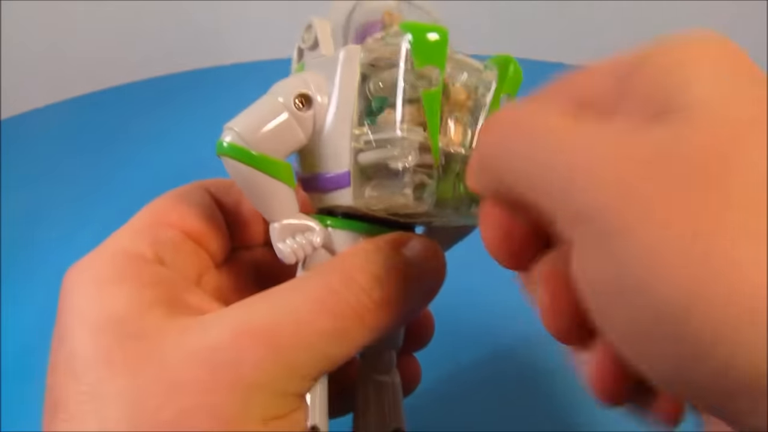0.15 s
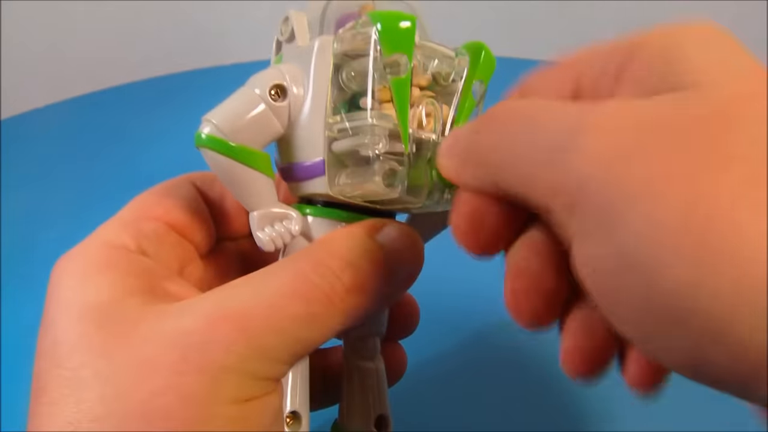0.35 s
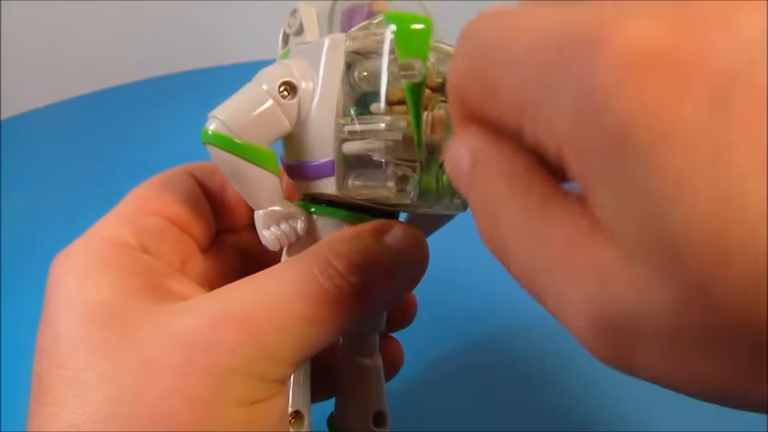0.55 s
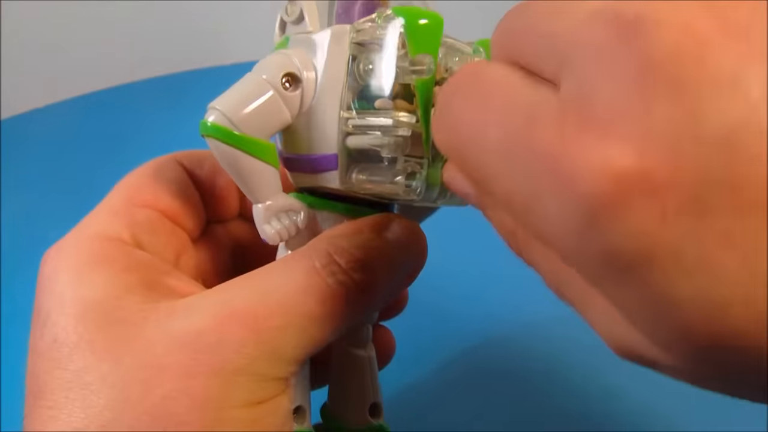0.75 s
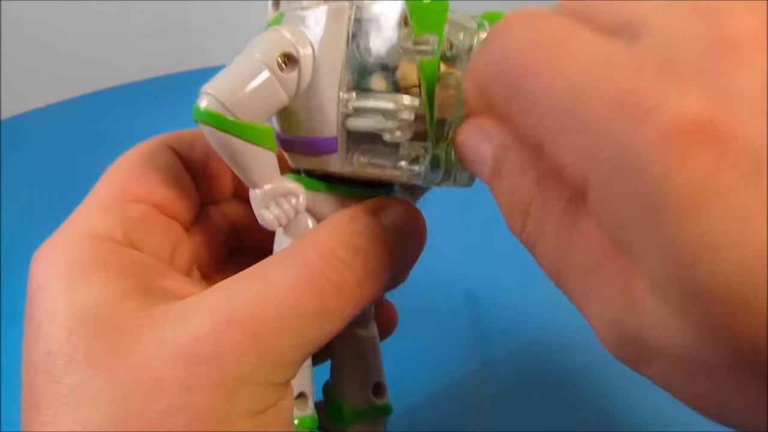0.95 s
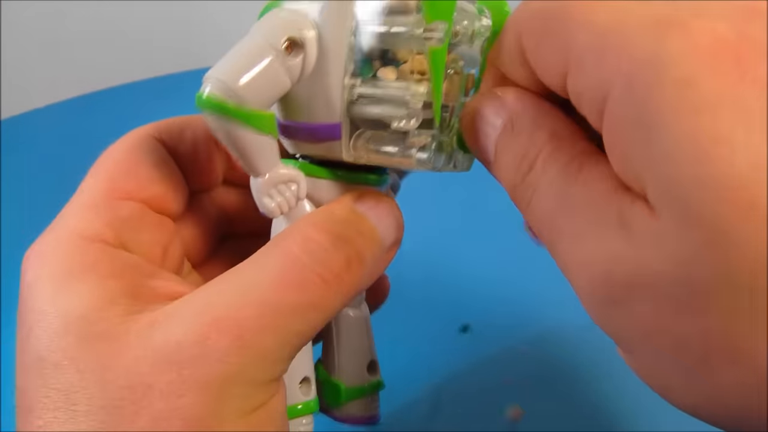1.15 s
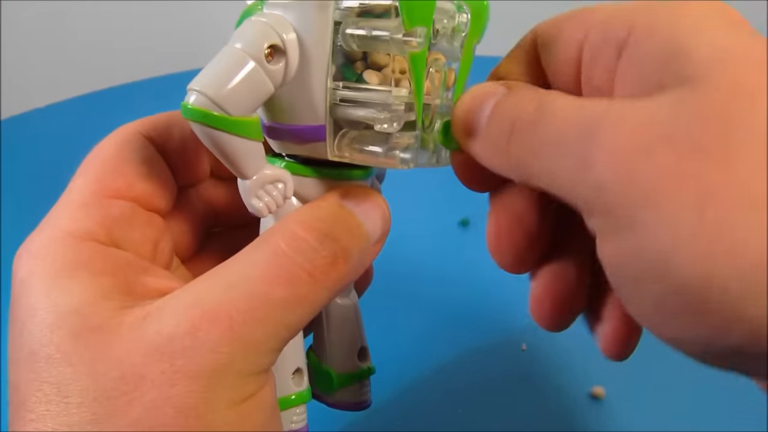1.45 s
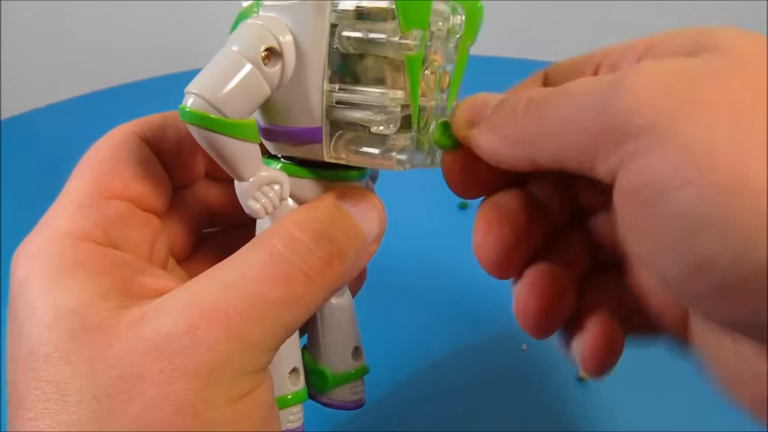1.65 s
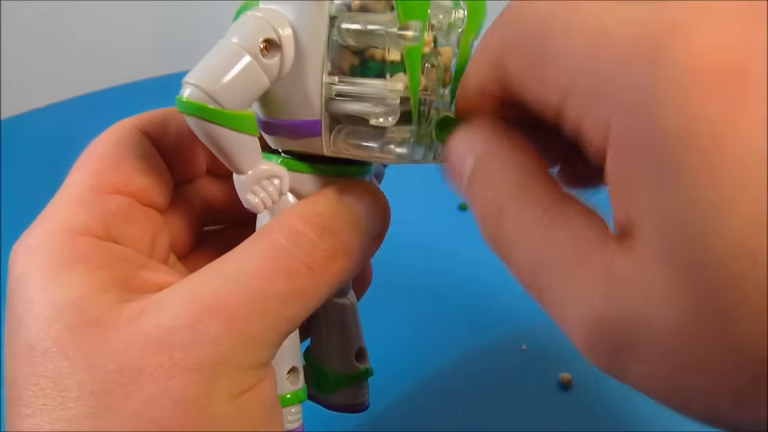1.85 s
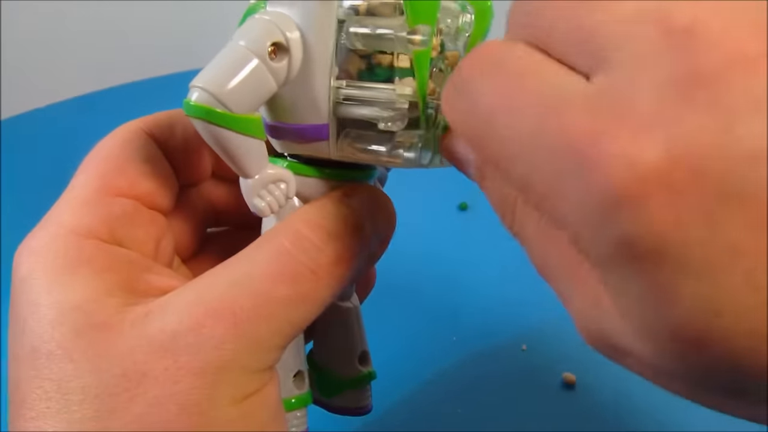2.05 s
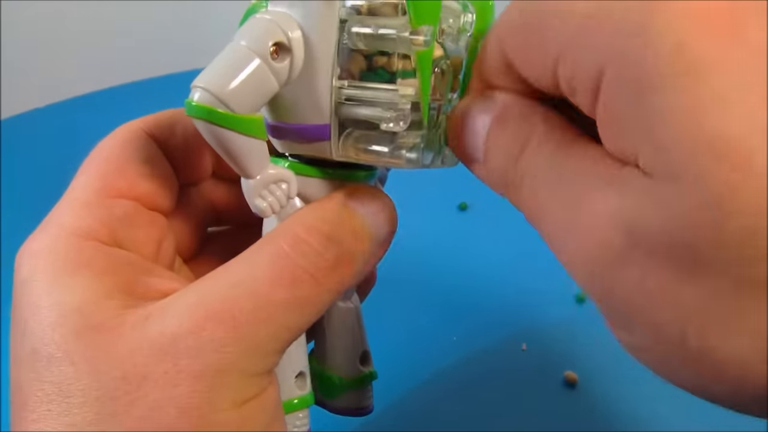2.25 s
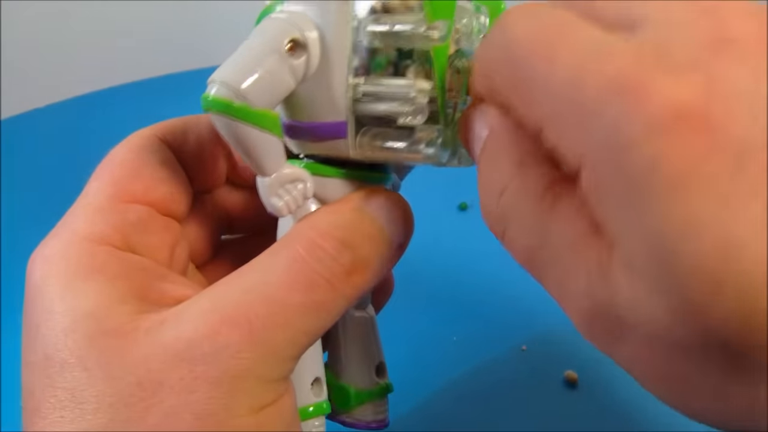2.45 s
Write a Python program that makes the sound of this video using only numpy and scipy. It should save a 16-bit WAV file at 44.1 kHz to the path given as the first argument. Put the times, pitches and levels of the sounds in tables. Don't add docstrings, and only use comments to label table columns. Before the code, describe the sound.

A small plastic wind-up toy whirrs with a harsh, buzzy gear rattle and sharp periodic snaps

```python
import sys
import numpy as np
from scipy import signal
from scipy.fft import rfft, irfft
from scipy.io import wavfile
from scipy.ndimage import uniform_filter1d

SR = 44100
rng = np.random.default_rng(int(sys.argv[2]) if len(sys.argv) > 2 else 0)


def attenuation_scalar(level_db):
    decades = np.asarray(level_db, float) / 20
    return 10 ** decades


def unload_audio(sound):
    columns = np.transpose(np.atleast_2d(sound))
    steps = np.round(np.clip(columns, -1, 1) * 32767)
    wavfile.write(sys.argv[1], SR, steps.astype(np.int16))


N = 114660


def unit(x):
    return x / np.sqrt(np.mean(x ** 2))


def ring(x, hz, width_hz):
    return signal.lfilter(*signal.iirpeak(hz, hz / width_hz, SR), x)


def colour(x, table):
    hz, db = np.array(table).T
    f = np.arange(2049) * SR / 4096 + 1
    log_gain = np.interp(np.log(f), np.log(hz), db) * np.log(10) / 20
    cepstrum = irfft(log_gain)
    cepstrum[1:2048] *= 2
    cepstrum[2049:] = 0
    response = irfft(np.exp(rfft(cepstrum)))[:2048]
    return signal.fftconvolve(x, response)[:len(x)]


def walk(rate_hz):
    k = int(SR / rate_hz)
    chance = rng.standard_normal(N // 50)[:N // k + 1]
    held = np.repeat(chance, k)
    return unit(uniform_filter1d(uniform_filter1d(held, k), k)[:N])


def clicks(at_s, size):
    at = np.clip(at_s * SR, 0, N - 2)
    i = at.astype(int)
    return np.bincount(i, size * (1 - at + i), N) + np.bincount(i + 1, size * (at - i), N)


RELEASES_S = [
    -.58,
    .2,
    .932,
    1.708,
    2.48,
]
TOOTH_DB = [
    0,
    -5,
    -4,
]
TURN_HZ, UNWIND_HZ_PER_S = 214, 8
RACE_HZ, RACE_S = 45, .33
TOOTH_SCATTER_DB, TOOTH_JITTER_S = 2, .0001


def tooth_ticks(t):
    since = t - np.array(RELEASES_S)[np.searchsorted(RELEASES_S, t, side="right") - 1]
    turn_hz = TURN_HZ - UNWIND_HZ_PER_S * t + RACE_HZ * np.exp(-since / RACE_S)
    contacts = len(TOOTH_DB) * np.cumsum(turn_hz * (1 + .006 * walk(12))) / SR
    k = np.arange(int(contacts[-1]))
    late, strong, sign = rng.standard_normal((N // 20, 3)).T[:, k]
    at_s = np.interp(k, contacts, t) + TOOTH_JITTER_S * late
    level_db = np.array(TOOTH_DB)[k % len(TOOTH_DB)] + TOOTH_SCATTER_DB * strong
    return clicks(at_s, attenuation_scalar(level_db) * np.sign(sign))


CHATTER_PER_S, CHATTER_DB = 2500, -6


def loose_chatter():
    wait, sign, weak = rng.random((N // 8, 3)).T
    at_s = np.cumsum(-np.log(wait)) / CHATTER_PER_S
    chatter = clicks(at_s, np.sign(sign - .5) * attenuation_scalar(-12 * weak))
    chatter[-2:] = 0
    return attenuation_scalar(CHATTER_DB) * chatter


# t/s, level/dB, grip of the hand on the shell/0-1
GEARS = [(0, -18.5, 0.4), (.045, -27.5, 0.86), (.07, -29, 0.32), (.17, -27.5, 0.08), (.25, -25, 0.12),
         (.42, -23, 0.15), (.62, -23.5, 0), (.92, -26, 0.16), (.955, -30.5, 0.3), (1.1, -25, 0.23),
         (1.28, -22.5, 0.28), (1.69, -25, 0.38), (1.76, -25.5, .7), (1.97, -23, 0.7), (2.099, -22, 1),
         (2.47, -23, 0.73), (2.52, -27.5, 0.95), (2.6, -23.5, .75)]
# f/Hz, width/Hz, peak level/dB, grip where it rings best/0-1, loss per unit of grip away/dB
SHELL = [(833, 28, -12.5, 0.7, 12.5), (1500, 29, -16, 0.6, 6), (1752, 24, -11.5, 0.44, 3.5),
         (2933, 117, 3, 0.02, 9), (3164, 104, 7, 0, 33.5), (3343, 120, 5, 0.71, 17),
         (4500, 190, -18, 0.66, 22), (5020, 39, -1.5, .95, -1), (5169, 94, 6.5, 0.84, 4.5),
         (5660, 132, 4.5, 0.12, 29), (6320, 204, -2.5, 0.27, 12), (6870, 133, -3.5, 0.64, 21.5),
         (8070, 330, -8.5, 0, 13), (9200, 330, -6.5, .4, -2)]
# f/Hz, level/dB
TICK = [(200, -39), (400, -40.5), (800, -15), (2200, -11), (3200, 1.5), (6500, -1), (11000, -12),
        (15500, -18.5)]
TICK_DB, SLIDE_DB = -4.5, -23.5
TICK_SMEAR_S = .004


def gears(t):
    s, db, grip = np.array(GEARS).T
    force = tooth_ticks(t) + loose_chatter() + attenuation_scalar(SLIDE_DB) * rng.standard_normal(N)
    g = np.clip(np.interp(t, s, grip), 0, 1)
    shell = np.zeros(N)
    for hz, width_hz, top_db, best, loss_db in SHELL:
        mode_db = top_db - loss_db * np.abs(g - best) + 1.34 * walk(8.98)
        shell += attenuation_scalar(mode_db) * ring(force, hz, width_hz)
    paths = rfft(rng.standard_normal(2048) * attenuation_scalar(-60 * t[:2048] / TICK_SMEAR_S))
    spread = irfft(paths / np.abs(paths))[:1024]
    force = signal.fftconvolve(force, spread)[:N]
    train = unit(shell + attenuation_scalar(TICK_DB) * colour(force, TICK))
    return train * attenuation_scalar(np.interp(t, s, db) + 0.95 * walk(24.615))


# t/s, peak level/dB, brightness f/Hz, t60/s, hollow body level/dB
KNOCKS = [(.004, -10, 7000, 0.004, -8), (.0165, -17, 7000, .006, -23), (.034, -12, 5500, 0.0068, -20),
          (0.0444, -20, 3500, 0.012, -12), (0.0476, 2.5, 3600, 0.011, -8), (0.049, -3.5, 3160, 0.016, 1),
          (0.0598, -7, 7500, 0.0058, -20), (0.1772, -1, 4140, 0.0044, -16), (0.1801, -8, 4500, 0.019, -13),
          (0.1992, 1, 3900, 0.011, -11), (0.2031, -9, 4000, .02, 1), (.208, -11.5, 9600, 0.075, -22),
          (0.271, -13, 3350, 0.015, -27), (.373, -12, 2730, 0.0084, -22), (0.931, -6, 1750, 0.017, 0.5),
          (.9326, -0.5, 3450, 0.013, -23), (0.9339, -4.5, 5530, .02, -7), (.940, -9, 6070, 0.04, -8),
          (.948, -12, 5500, 0.0068, -20), (1.073, -15.5, 3300, 0.0063, -21),
          (1.101, -18.5, 5700, .004, -20), (1.155, -13, 8500, .004, -18), (1.191, -9.5, 7900, 0.0073, -12),
          (1.209, -12, 7500, .003, -22), (1.214, -13, 8000, 0.0095, -14), (1.245, -12, 3000, 0.0062, -20),
          (1.329, -15, 5200, 0.0052, -20), (1.338, -14, 5800, 0.0046, -20), (1.707, -12, 1810, 0.0086, -14),
          (1.7086, 1, 4240, 0.013, -1), (1.7089, -5, 4500, 0.023, -1), (1.713, -7, 6500, 0.055, -10),
          (2.2487, -6.5, 2530, 0.019, -26), (2.4799, 0.5, 3150, 0.011, -9), (2.482, -6.5, 5000, 0.014, -10),
          (2.486, -3, 6800, 0.021, -12), (2.498, -14.5, 3600, .01, -20), (2.5049, -10.5, 6500, 0.014, -23),
          (2.583, -20, 2000, 0.035, -8)]
KNOCK_RISE_S, KNOCK_RING_DB, KNOCK_SCATTER_DB = .0004, -3, 4
KNOCK_BRIGHT_DB, KNOCK_THUD_DB, KNOCK_LOW_HZ, KNOCK_TOP_HZ = 2.5, -15, 510, 12400


def knocks():
    n = 4096
    out = np.zeros(N + 2 * n)
    u = np.arange(n) / SR
    low_cut = signal.butter(3, KNOCK_LOW_HZ, "high", fs=SR, output="sos")
    for s, db, bright_hz, t60, body_db in KNOCKS:
        sign, size = rng.standard_normal((2, n))
        hit = np.sign(sign) * attenuation_scalar(3 * size) * (1 - np.exp(-u / KNOCK_RISE_S)) * attenuation_scalar(-60 * u / t60)
        hit = signal.lfilter(*signal.butter(1, KNOCK_TOP_HZ, fs=SR), hit)
        shell = np.zeros(n)
        for luck, (hz, width_hz, top_db, *_) in zip(rng.standard_normal(len(SHELL)), SHELL):
            shell += attenuation_scalar(KNOCK_SCATTER_DB * luck + top_db / 2) * ring(hit, hz, 2 * width_hz)
        bright = unit(ring(hit, bright_hz, 0.37 * bright_hz))
        body = unit(ring(hit, 1770, 170)) + attenuation_scalar(KNOCK_THUD_DB) * unit(ring(hit, 833, 100))
        x = unit(colour(hit, TICK)) + attenuation_scalar(KNOCK_BRIGHT_DB) * bright
        x = x + attenuation_scalar(KNOCK_RING_DB) * unit(shell) + attenuation_scalar(body_db) * body
        x = signal.sosfilt(low_cut, x)
        i = int(s * SR)
        out[i:i + n] += x / np.abs(x).max() * attenuation_scalar(db)
    return out[:N]


ROOM_DB, ROOM_T60_S = -14, .1


def echo(toy, t):
    tail = rng.standard_normal(SR // 3) * attenuation_scalar(-60 * t[:SR // 3] / ROOM_T60_S)
    tail = tail / np.sqrt(np.sum(tail ** 2))
    return attenuation_scalar(ROOM_DB) * signal.fftconvolve(toy, tail)[:N]


# f/Hz, rms level/dB
HUM = [
    (60, -90),
    (120, -74),
    (180, -79.5),
    (240, -71.5),
    (540, -81),
]
# f/Hz, level/dB
AIR = [(15, -58), (25, -30), (65, -27), (113, -11), (236, 2), (354, -24), (700, -13), (910, -26),
       (1540, -120)]


def background(t):
    hum = sum(np.sqrt(2) * attenuation_scalar(db) * np.sin(2 * np.pi * (hz * t + rng.random())) for hz, db in HUM)
    return hum + attenuation_scalar(-77.5) * unit(colour(rng.standard_normal(N), AIR))


def scene():
    t = np.arange(N) / SR
    toy = gears(t) + knocks()
    return np.tile(toy + echo(toy, t) + background(t), (2, 1))


def band_limit(x):
    return signal.sosfilt(signal.butter(12, 16450, fs=SR, output="sos"), x)


def record(dry):
    notch_hz, notch_width_hz, top_hz = 8090, 98, 15150
    x = signal.lfilter(*signal.iirnotch(notch_hz, notch_hz / notch_width_hz, SR), dry)
    x = signal.sosfilt(signal.ellip(8, .2, 60, top_hz, fs=SR, output="sos"), x)
    x = signal.sosfilt(signal.butter(1, 40, "high", fs=SR, output="sos"), x)
    return band_limit(np.clip(x, -1, 1))


dry = scene()
out = record(dry)
unload_audio(out)
```